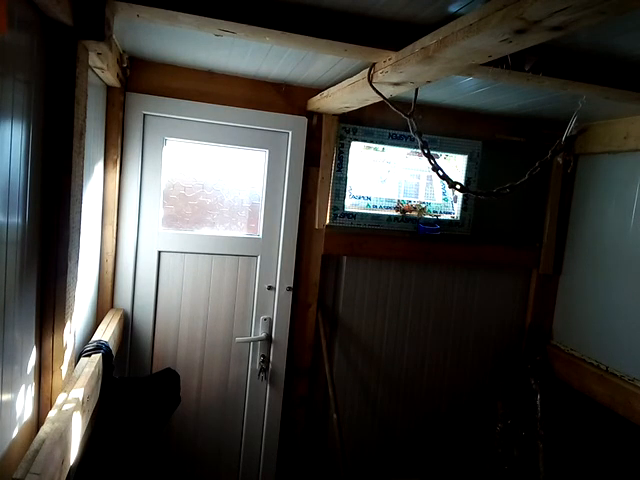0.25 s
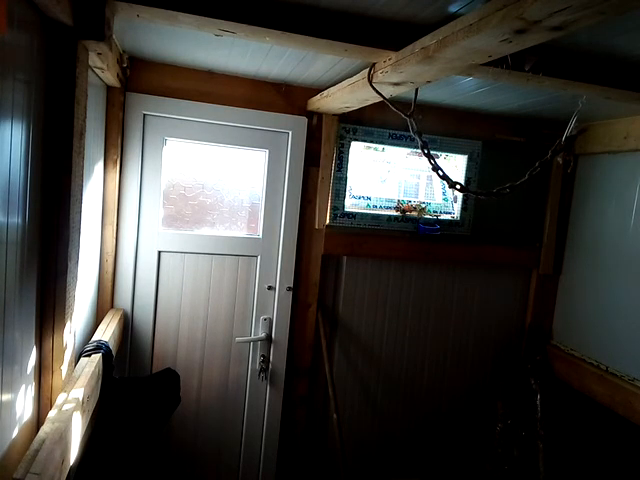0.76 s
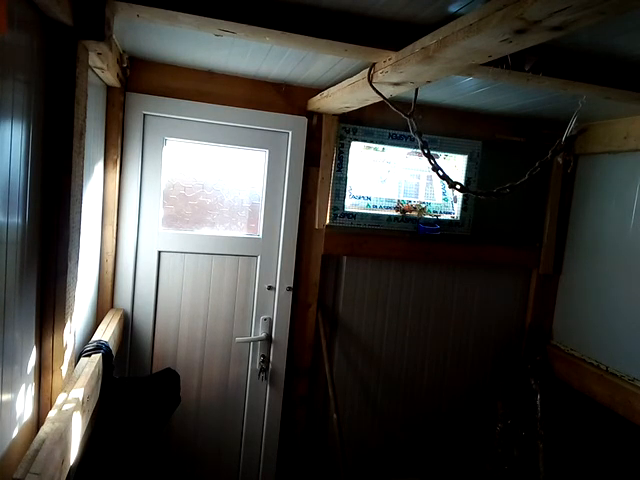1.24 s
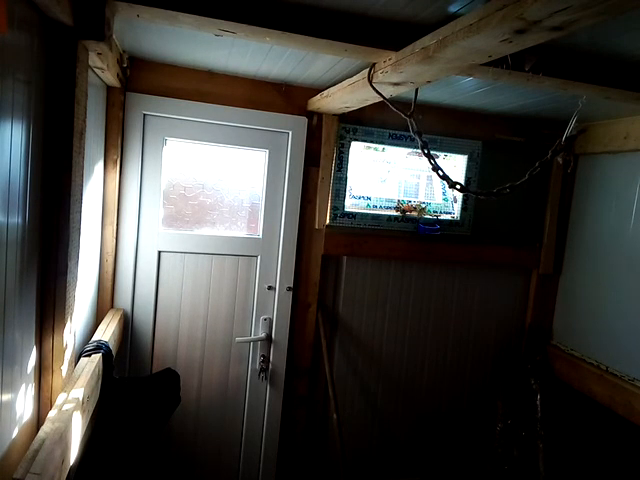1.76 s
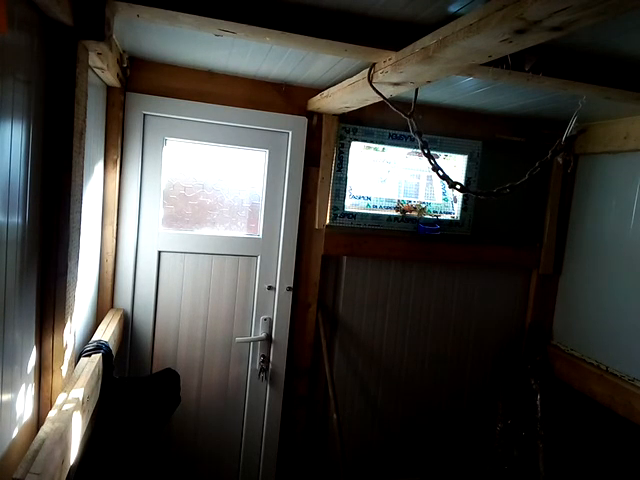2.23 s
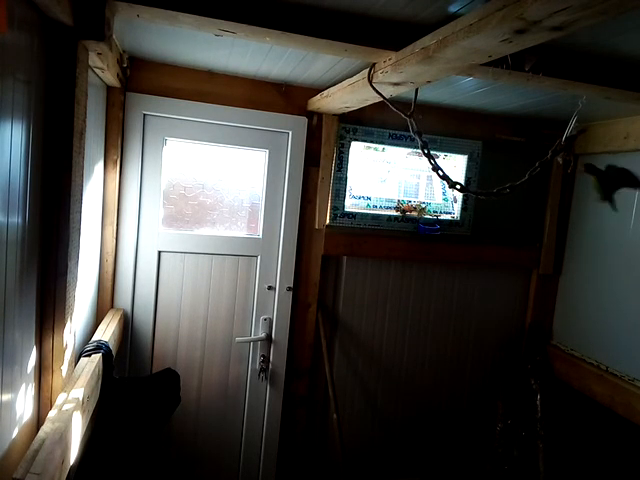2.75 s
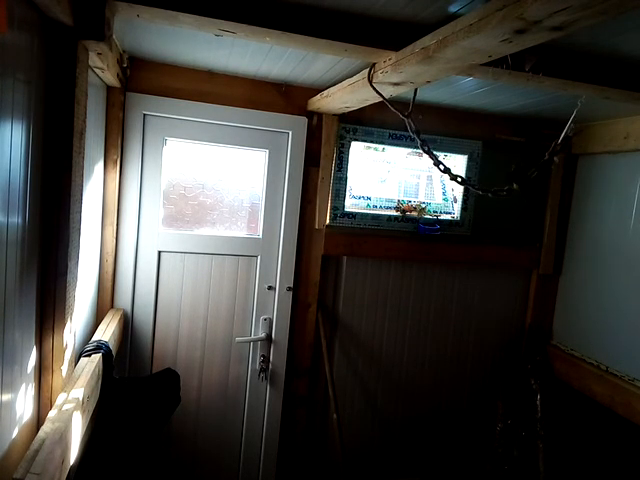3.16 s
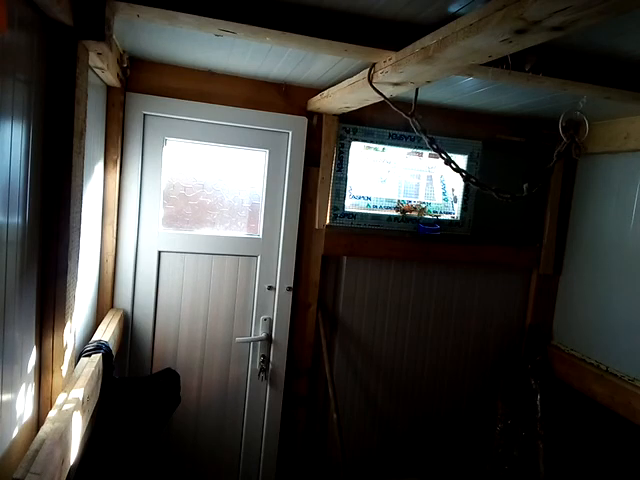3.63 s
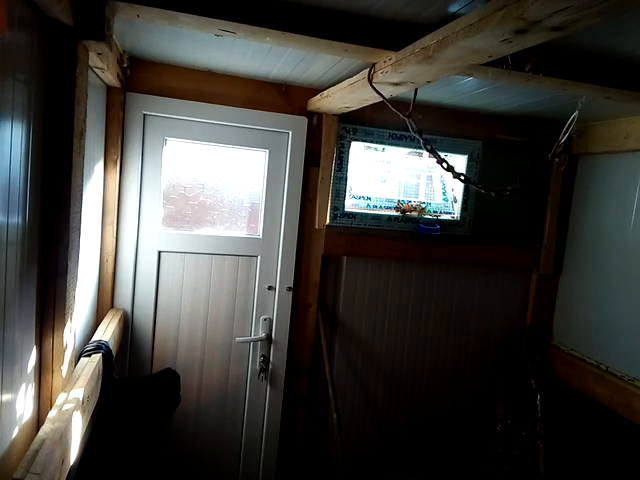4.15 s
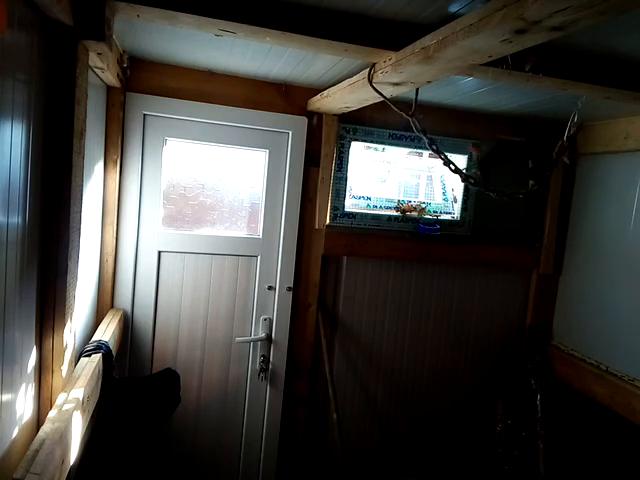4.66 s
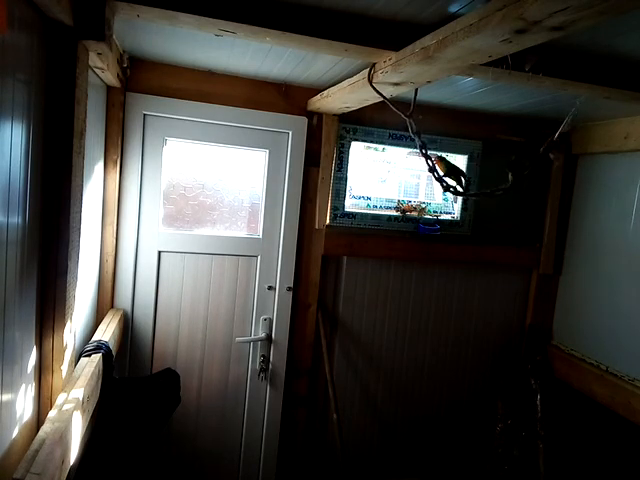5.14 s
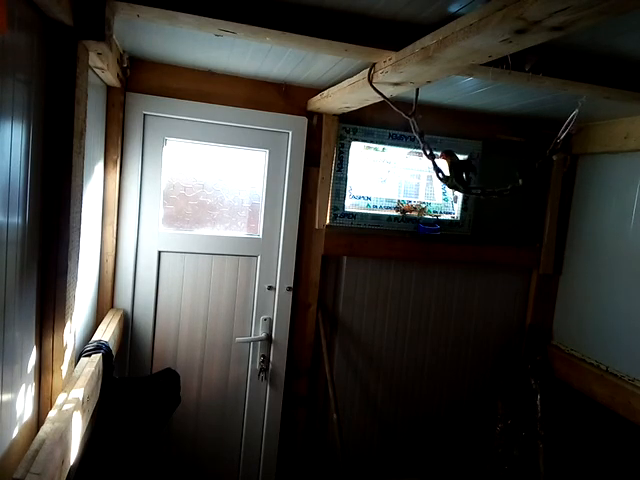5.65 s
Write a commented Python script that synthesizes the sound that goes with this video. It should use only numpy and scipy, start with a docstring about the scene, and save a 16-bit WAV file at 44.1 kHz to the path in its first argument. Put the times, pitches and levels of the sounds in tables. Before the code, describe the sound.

Inside a small wooden bird room, sharp gliding chirps burst out in groups with gaps between. Wings throb low and puff air, feathers rustle, a hanging chain tinkles faintly early on, and wood thuds softly as birds shift. A soft swish passes before the loudest, most crowded chatter near five seconds; a final brief group follows. Close indoor pickup, dense short reverberation, low thrum throughout, and clipped loudest calls.

```python
"""Small parrots call in a wooden aviary room, over feather rustle, wood drumming and a low thrum throughout.
The first whistles, short gliding tones with overtones, come at once; then a chain tinkles faintly, as ringing
sines, and birds take off: the thrum throbs and wing beats puff as bursts of noise. Calls crowd in from 1 to
2.4 s and from 2.9 to 4 s, some harsh, all smeared by dense echoes. Swishes of noise pass at 2.8 s and about
4.5 s, the busiest calls follow until 5.3 s, and a last few come at 5.6 s. The loudest calls overload."""
import sys
import numpy as np
from scipy import signal
from scipy.fft import rfft, irfft
from scipy.io import wavfile

SR = 44100
rng = np.random.default_rng(int(sys.argv[2]) if len(sys.argv) > 2 else 0)


def store_wav(level_fs):
    """Save 16-bit WAV to argv[1]."""
    pcm = np.round(np.clip(np.atleast_2d(level_fs), -1, 1) * 32767)
    wavfile.write(sys.argv[1], SR, pcm.T.astype(np.int16))


N = 259749  # length in samples, about 5.9 s


def from_db(db):
    """Turn decibels into a plain factor."""
    return 10 ** (np.asarray(db) / 20)


def rms_one(x):
    """Scale a sound to an average strength (rms) of 1."""
    return x / np.sqrt(np.mean(x ** 2) + 1e-20)


def at_hz(points, hz):
    """Read a (Hz, value) table at any pitch, with straight lines on a log pitch scale."""
    table = np.array(points)
    return np.interp(np.log(hz), np.log(table[:, 0]), table[:, 1])


def wander(hz):
    """Noise that changes about hz times a second; spread 1."""
    r = np.exp(-2 * np.pi * hz / SR)
    smooth = signal.lfilter([1], [1, -2 * r, r * r], rng.standard_normal(N + SR))
    return rms_one(smooth[SR:])  # the first second is the filter settling


def band_pass(x, low_hz, high_hz):
    """Keep only the part of a sound between two pitches."""
    return signal.sosfilt(signal.butter(2, [low_hz, high_hz], "band", fs=SR, output="sos"), x)


def layer(spectrum, low_hz, high_hz, modes=()):
    """Coloured noise, lifted at resonances, scaled to rms 1 between low_hz and high_hz."""
    hz = np.maximum(np.fft.rfftfreq(N, 1 / SR), 1)
    level_db = at_hz(spectrum, hz)
    for mode_hz, width, lift_db in modes:
        level_db = level_db + lift_db / (1 + (2 * (hz - mode_hz) / width) ** 2)
    shape = from_db(level_db) * (hz >= spectrum[0][0]) * (hz <= spectrum[-1][0])
    noise = irfft(rfft(rng.standard_normal(N)) * shape, N)
    in_band = shape[(hz > low_hz) & (hz < high_hz)]
    return rms_one(noise) * np.sqrt(np.sum(shape ** 2) / np.sum(in_band ** 2))


# The notes of the calls. Each row: start in seconds, length in seconds, pitch at the start, middle and end in Hz,
# effort in dB, level change per partial in dB, half lines in dB, roughness from 0 to 1.
NOTES = [(0.088, 0.0059, 3450, 3390, 3440, -9.5, -14, -7, 0.54),
         (0.088, 0.02, 2735, 2328, 2140, -17, -1.5, -20, 0.43),
         (0.097, 0.034, 4490, 4340, 4260, -15, 3, -32, 0.25),
         (0.133, 0.03, 3766, 4120, 4390, -12, 2, -41, 0.08),
         (0.418, 0.023, 2150, 2206, 2250, -30, -22, -30.0, 0.22),
         (0.771, 0.025, 2350, 2200, 2210, -37, -37, -36.0, 0.0),
         (1.003, 0.014, 2420, 2480, 2770, -10, -2, -17, 0.22),
         (1.094, 0.018, 2490, 2585, 2700, -14, -1.7, -25, 0.34),
         (1.095, 0.016, 3025, 2850, 3120, -12.5, -1, -31, 0.12),
         (1.184, 0.014, 2667, 2565, 2920, -10, 0.3, -20, 0.2),
         (1.642, 0.014, 2158, 2284, 3070, -11, -0.3, -10, 0.5),
         (1.652, 0.024, 5520, 5100, 5010, -4.5, 2.5, -48.5, 0.36),
         (1.655, 0.014, 6800, 6940, 6950, -8, -8, -21.5, 0.17),
         (1.764, 0.019, 5840, 6850, 6800, 0.2, -4, -29.5, 0.09),
         (1.768, 0.033, 5520, 5450, 5290, -17.5, -8, -12, 0.16),
         (2.109, 0.017, 2534, 2974, 4170, -6.4, -2.5, -40.5, 0.01),
         (2.124, 0.027, 4590, 4320, 3720, -7.0, -0.5, -24, 0.32),
         (2.155, 0.014, 2840, 3090, 3410, -6, -3, -27, 0.48),
         (2.162, 0.035, 3870, 4340, 4630, -7.5, -0.5, -36, 0.23),
         (2.29, 0.013, 3080, 3180, 2850, -11.5, -2.5, -17, 0.55),
         (2.303, 0.03, 2306, 2277, 2270, -8.5, -0.45, -10, 0.3),
         (2.316, 0.037, 2316, 3118, 3366, -3.5, -1.75, -4, 0.24),
         (2.356, 0.033, 3167, 3183, 2950, -6, -1.1, -9, 0.4),
         (2.939, 0.017, 1983, 2058, 2123, -0.7, -7, -21, 0.16),
         (2.959, 0.029, 2677, 3484, 3770, -1.5, -9, -17.5, 0.28),
         (2.978, 0.054, 5700, 5700, 6520, -14, 6, -3, 0.42),
         (2.981, 0.019, 2416, 2420, 2156, -3.6, -2, -1, 0.15),
         (3.034, 0.051, 3900, 3622, 3453, 0.1, -16, -48, 0.18),
         (3.085, 0.052, 4700, 4408, 4366, -2, -6.5, -50, 0.06),
         (3.55, 0.02, 2404, 2586, 2484, -17, -4, -6, 0.2),
         (3.562, 0.053, 2693, 2766, 2904, -11.5, -1.65, -2.0, 0.86),
         (3.61, 0.037, 2918, 2697, 2627, -7, -3.1, -9, 0.5),
         (3.683, 0.031, 3760, 3810, 3934, -6.5, -10, -39, 0.21),
         (3.827, 0.03, 1802, 1880, 2066, -9.5, -1, -17, 0.28),
         (3.84, 0.019, 4310, 4670, 4400, -14, -1, -20, 0.66),
         (3.86, 0.014, 3990, 3925, 4030, -5.5, -3, -31, 0.03),
         (3.931, 0.015, 2520, 2825, 3010, -6.5, -4.5, 2, 0.15),
         (3.938, 0.034, 4505, 4280, 4145, -13, -3, -28.5, 0.15),
         (3.95, 0.027, 2935, 2970, 3107, -3.5, -4.5, -23.5, 0.01),
         (4.733, 0.033, 2033, 2130, 2460, -11, -7.5, -21.5, 0.3),
         (4.753, 0.03, 2965, 2884, 3154, -3, -11.5, -28.5, 0.24),
         (4.757, 0.031, 3710, 3950, 4503, -3, -5, -16, 0.29),
         (4.76, 0.0484, 5950, 5390, 5280, -15.5, 4.5, -14.5, 0.55),
         (4.78, 0.044, 4233, 4460, 4700, -4.5, -11, 0, 0.51),
         (4.825, 0.071, 4370, 3897, 3440, -1.5, -14.5, -27, 0.32),
         (4.878, 0.013, 2460, 2550, 3100, -2, -14.5, -25.5, 0),
         (4.888, 0.048, 4313, 4370, 4343, -1.5, -12, -38.5, 0.2),
         (4.905, 0.022, 5790, 5430, 5100, -14, -4, -26.5, 0.1),
         (4.919, 0.018, 4425, 4610, 4850, -2.8, -11, -43.5, 0.2),
         (4.947, 0.031, 4700, 4754, 4740, -5, -2.5, -30.5, 0.19),
         (5.025, 0.0153, 1886, 1890, 2010, 1.2, -4, -25, 0.18),
         (5.049, 0.042, 4174, 4090, 3964, -2.5, -14, -28.0, 0.27),
         (5.122, 0.036, 2526, 3063, 2880, -12, -1, -19.0, 0.14),
         (5.128, 0.019, 3860, 4400, 3992, -3, -12.5, -30, 0.11),
         (5.134, 0.035, 3053, 2957, 3285, -2, -8, -34.5, 0.2),
         (5.21, 0.016, 2250, 2620, 2890, -6, -13.5, -18, 0),
         (5.222, 0.045, 3654, 4056, 3957, -2.5, -9, -28, 0.17),
         (5.262, 0.032, 4600, 5796, 5855, -5.5, -12.7, -15, 0.19),
         (5.267, 0.023, 4740, 5030, 5220, -9.5, -4, -14, 0.2),
         (5.575, 0.048, 2605, 2620, 2690, -42.5, -15, -25.0, 0.23),
         (5.616, 0.007, 1986, 2100, 2270, -3.5, -2, -8.5, 0.37),
         (5.62, 0.028, 4290, 4724, 4645, -8, -2, -37.0, 0.17),
         (5.625, 0.022, 6420, 6090, 5900, -13.5, -2, -27, 0.11),
         (5.63, 0.013, 5280, 5284, 5450, -7, -8, -9, 0.56)]
# What throat and beak let through. Each row: pitch in Hz, level in dB.
THROAT = [(1800, -6), (3000, -7.5), (4200, -1.5), (6200, 1.5), (7400, -6.5), (9000, -15), (12000, -21.5),
          (18000, -38.5)]
THROAT_CUT_HZ = 2522  # the calls thin out below this
PERCHES = 3
WOBBLE, TREMOR_DB = .11, 6  # fast pitch wobble (share of pitch) and level wobble of a fully rough voice
QUAVER = .006  # slower pitch wobble of every voice, share of pitch
ATTACK_S, CLEAN_ATTACK = 0.0022, 0.39  # shortest swell; share of a perfectly clean note spent swelling
FADE_S = 0.00043
BLOOM_S = 0.0014  # above the second, each higher partial takes this much longer to come in
HALF_FALL_DB = -7  # per whole partial away from the strongest half line
SHUT_BELOW_HZ, SHUT_LOSS_DB = 2200, -12  # a beak still shut muffles low notes above the second partial


def birds():
    """Gliding tones pass the throat; rough voices wobble, and uneven cycles add half lines. One row per perch."""
    perches = np.zeros((PERCHES, N))
    pitch_noise, slow_noise, level_noise = wander(590), wander(60), wander(630)
    for k, (start, length, hz0, hz1, hz2, effort_db, fall_db, half_db, rough) in enumerate(NOTES):
        first, t = round(start * SR), np.arange(round(length * SR)) / SR
        span = slice(first, first + len(t))
        glide = np.interp(t / length, [0, .5, 1], [hz0, hz1, hz2])
        pitch = glide * (1 + WOBBLE * rough * pitch_noise[span] + QUAVER * slow_noise[span])
        phase = 2 * np.pi * np.cumsum(pitch) / SR

        # harsh notes break in at once, clean ones swell
        attack_s = max(ATTACK_S, CLEAN_ATTACK * length * (1 - 4.0 * rough))
        ramp = np.clip(np.minimum(t / attack_s, (length - t) / FADE_S), 0, 1)
        tremor = from_db(TREMOR_DB * rough * level_noise[span])
        swell = np.sqrt(2) * np.sin(np.pi / 2 * ramp) * tremor

        for multiple in np.arange(1, 13) / 2:
            level_db = effort_db + fall_db * (multiple - 1) + at_hz(THROAT, multiple * glide)
            if hz1 < SHUT_BELOW_HZ and multiple > 2:
                level_db += SHUT_LOSS_DB
            if multiple % 1:  # a half line; the one just above the fundamental is favoured
                level_db += half_db + HALF_FALL_DB * abs(multiple - 3 / 2)
            in_range = multiple * glide < SR / 2.5
            bloom = np.clip(t / (BLOOM_S * max(multiple - 2, .1)), 0, 1) ** 2
            perches[k % PERCHES, span] += in_range * bloom * swell * from_db(level_db) * np.sin(multiple * phase)
    return signal.sosfilt(signal.butter(6, THROAT_CUT_HZ, "high", fs=SR, output="sos"), perches)


# How long the echoes last. Each row: pitch in Hz, time to die by 60 dB in seconds.
ROOM_T60 = [(1500, 0.23), (4000, 0.29), (8000, 0.26), (14000, 0.23)]
DIRECT_DB, ECHO_DB = -10, -8.0
ECHO_RISE_S = 0.0039  # the cloud of echoes thickens over this time


def room(x):
    """Direct sound, then a dense cloud of wall echoes that dies band by band."""
    t, edges = np.arange(SR) / SR, 500 * 2 ** np.arange(0, 5.3, .5)  # half octaves
    echoes = np.zeros(len(t))
    for low, high in zip(edges, edges[1:]):
        band = band_pass(rng.standard_normal(len(t)), low, high)
        echoes += band * from_db(-60 * t / at_hz(ROOM_T60, np.sqrt(low * high)))
    echoes *= np.clip(t / ECHO_RISE_S, 0, 1) ** 2
    echoes /= np.sqrt(np.sum(echoes ** 2))
    return from_db(DIRECT_DB) * x + from_db(ECHO_DB) * signal.fftconvolve(x, echoes)[:N]


AIR_HZ = (700, 1650)  # band in which the levels of wing beats and rustle hold
# Wing beats. Each row: start in seconds, peak level in dB before the room, time to fall by 9 dB in seconds.
FLAPS = [(0.894, -36, 0.031), (0.959, -35.5, 0.01), (1.254, -35.5, 0.037), (1.492, -44.5, 0.029),
         (1.582, -44.5, 0.045), (1.955, -40, 0.022), (2.018, -33, 0.021), (2.765, -58, 0.023),
         (3.662, -34.5, 0.026), (4.19, -49, 0.028), (4.669, -53, 0.075), (4.843, -22.5, 0.036),
         (5.745, -37.5, 0.0083)]
# Colour of a wing beat. Each row: pitch in Hz, relative level in dB per Hz.
FLAP = [(380, -46.5), (650, -10), (1090, -1), (2830, -3), (4570, -2.5), (4950, -12), (5880, 0),
        (15500, -23.5)]


def wings():
    """Each beat is a sudden puff of air noise that dies away quickly."""
    t, puffs = np.arange(N) / SR, np.zeros(N)
    for start, peak_db, length in FLAPS:
        puffs += (t >= start) * from_db(peak_db - 9 * np.maximum(t - start, 0) / length)
    return puffs * layer(FLAP, *AIR_HZ)


# A bird sweeps past. Each row: time of the peak in seconds, length in seconds, peak level in dB.
SWISHES = [(4.4, 0.11, -55.5), (4.535, 0.24, -41), (2.8, 0.1, -60)]
# Colour of the swish. Each row: pitch in Hz, relative level in dB per Hz.
SWISH = [(410, -40), (700, -10), (1260, 0), (1510, -8.5), (2030, -3), (4110, -3.5), (6600, -9),
         (15000, -37)]


def swishes():
    """Air through spread feathers swells and fades smoothly, as bright noise."""
    t, swell = np.arange(N) / SR, np.zeros(N)
    for peak, length, peak_db in SWISHES:
        swell += from_db(peak_db) * np.cos(np.pi * np.clip((t - peak) / length, -.5, .5)) ** 2
    return swell * layer(SWISH, 700, 15000)


# Touches of a hanging chain. Each row: start in seconds, level in dB before mode levels, chance and the room.
TINKLES = [(.414, -49.5), (.755, -58.5), (.85, -56)]
# Tones (modes) of the links. Each row: pitch in Hz, relative level in dB, time to die by 60 dB in seconds.
CHAIN = [(7040, 8, .1), (10500, -6, .1), (9900, -10, .08)]


def chain():
    """Each touch of the links rings every mode with a strength of its own."""
    out = np.zeros(N)
    for start, peak_db in TINKLES:
        t = np.maximum(np.arange(N) / SR - start, 0)
        for hz, mode_db, t60 in CHAIN:
            level_db = peak_db + mode_db + rng.normal(0, 2) - 60 * t / t60
            out += from_db(level_db) * np.sin(2 * np.pi * hz * t)
    return out


# Colour of the feather rustle. Each row: pitch in Hz, relative level in dB per Hz.
RUSTLE = [(380, -35), (650, -15), (732, 2.5), (848, 4.5), (1520, 2), (2170, -2.5), (5290, -12), (6370, -12),
          (15500, -40)]
GRAIN_DB, PATCH_DB = 1.0, 1.3  # spread of the quick grains and of the slower changes in each half octave


def rustle():
    """Feather noise in grains; each half octave comes and goes on its own."""
    noise, edges = layer(RUSTLE, *AIR_HZ), 600 * 2 ** np.arange(0, 5.1, .5)
    patches = np.zeros(N)
    for low, high in zip(edges, edges[1:]):
        patches += from_db(PATCH_DB * wander(19)) * band_pass(noise, low, high)
    return from_db(GRAIN_DB * wander(72)) * patches


# Flights, a low throb of air at every beat. Each row: start in seconds, length in seconds, beats per second,
# peak level in dB.
FLIGHTS = [(0.538, 0.096, 17, -42), (0.947, .23, 20, -35.5), (1.949, 0.17, 22, -35),
           (2.224, 0.29, 19, -33.5), (2.583, 0.1, 19, -46), (2.72, 0.033, 18.5, -25),
           (3.805, .45, 19.6, -38), (4.341, .045, 19, -35), (4.587, 0.065, 19, -42),
           (4.835, 0.25, 21, -48.5)]
BEAT_DEPTH = 0.93  # share of the throb that comes and goes with the beat
TAKE_OFF_S, THRUM_WAVER_DB = 0.028, 4  # time for a flight to come in and go; spread of the slow waver


def throb(rest):
    """Loudness of the low thrum: it wavers at rest and pulses with the wing beat of each flight."""
    t, level = np.arange(N) / SR, rest * from_db(THRUM_WAVER_DB * wander(4))
    for start, length, per_s, peak_db in FLIGHTS:
        aloft = np.clip(np.minimum(t - start, start + length - t) / TAKE_OFF_S, 0, 1)
        beat = 1 - BEAT_DEPTH * np.cos(np.pi * per_s * (t - start)) ** 2
        level = np.hypot(level, from_db(peak_db) * aloft * beat)
    return level


# Background of the room. Each row: time in seconds, feather rustle in dB, wood drumming in dB, low thrum in dB
# before its waver.
STIR = [(0.0, -51.5, -59.5, -45), (0.29, -59, -57, -50), (0.43, -71, -53, -50), (0.93, -47.5, -60, -41.5),
        (1.1, -47.5, -45, -44), (1.39, -48.5, -51, -49.5), (1.93, -51, -51.5, -48), (2.12, -53.5, -53, -50),
        (2.48, -50.5, -53, -39), (2.85, -48.5, -52.5, -52), (3.08, -58, -60.5, -47), (3.71, -49, -54, -56),
        (3.85, -51, -46, -45), (4.0, -50, -45.5, -34.5), (4.35, -53, -51, -51.5), (4.89, -47, -54.5, -48),
        (5.1, -61.5, -62, -49.5), (5.43, -51, -52, -49), (5.69, -54.5, -62, -47), (5.89, -52, -55.5, -47)]
# Birds shift on the wood. Each row: time of the peak in seconds, rustle in dB, drumming in dB, rise in seconds,
# fall in seconds; rise and fall are each the time for 12 dB.
SHIFTS = [(.4, -45.5, -61, 0.25, 0.36), (.9, -36, -43.5, 0.0081, 0.17), (1.05, -33.5, -34, 0.081, 0.073),
          (1.288, -36, -33.5, .03, 0.068), (1.53, -61, -43.5, 0.022, 0.093), (1.66, -41.5, -44, 0.11, 0.15),
          (1.801, -35.5, -60, .02, 0.035), (1.87, -61, -41.5, 0.02, 0.077),
          (1.98, -34.5, -38.5, 0.064, 0.13), (2.43, -44, -39, .04, 0.04),
          (2.589, -41.5, -44.5, 0.043, 0.054), (2.76, -50, -52.5, 0.039, 0.052),
          (3.35, -52.5, -47.5, 0.1, 0.039), (3.669, -41.5, -45, .01, 0.065),
          (3.77, -41, -42.5, 0.098, 0.093), (4.212, -43.5, -50, 0.22, 0.045),
          (4.54, -52.5, -45, 0.046, 0.067), (4.671, -51, -44, 0.0084, 0.086),
          (4.871, -44, -32, 0.024, 0.053), (5.0, -40.5, -46, 0.059, 0.11), (5.13, -66, -63, .02, 0.083)]
# Colours of the drumming, the thrum and a steady far-off rumble. Each row: pitch in Hz, relative level in dB per Hz.
DRUMMING = [(97, -32.5), (165, -1), (253, -1), (286, -3.5), (329, 2.5), (527, 6), (700, -1.5), (910, -38),
            (1540, -120)]
THRUM = [(40, -22.5), (46, -16), (52, 3.5), (145, -1), (160, -13.5), (170, -15)]
RUMBLE = [(8.8, -35), (15, -10), (27, -12.5), (48, -1.5), (62, -25.5), (110, -120)]
# Resonances of walls and floor. Each row: pitch in Hz, width in Hz, lift in dB.
WOOD = [(62, 8.5, 5.5), (79, 11, -2), (97.1, 32, 8.5), (136.3, 8.7, 11.5), (185, 33, 4), (215.8, 47, 12.5),
        (285.1, 38, 13.5), (374, 3.3, 10), (512, 17, 5.5), (577, 24, 6)]
WOOD_HZ, THRUM_HZ, RUMBLE_HZ = (170, 650), (40, 165), (10, 49)  # bands in which the levels hold
RUMBLE_DB = -62


def stirring():
    """Feathers rustle in grains; the wooden walls drum and thrum beneath, over a far rumble."""
    t, (times, *columns) = np.arange(N) / SR, np.transpose(STIR)
    rustling, drumming, rest = from_db([np.interp(t, times, column) for column in columns])
    for peak, rustle_db, drumming_db, rise, fall in SHIFTS:
        swell_db = -12 * np.maximum((peak - t) / rise, (t - peak) / fall)
        rustling = np.hypot(rustling, from_db(rustle_db + swell_db))
        drumming = np.hypot(drumming, from_db(drumming_db + swell_db))
    feathers = rustling * rustle()
    walls = drumming * layer(DRUMMING, *WOOD_HZ, WOOD)
    thrum = throb(rest) * layer(THRUM, *THRUM_HZ, WOOD)
    rumble = from_db(RUMBLE_DB) * layer(RUMBLE, *RUMBLE_HZ)
    return feathers + walls + thrum + rumble


def scene():
    """Every perch has its own pattern of echoes; wing beats and chain share another."""
    voices = sum(room(voice) for voice in birds())
    return (voices + room(wings() + chain()) + stirring() + swishes())[None]


CUTOFF_HZ = 15800


def record(dry):
    """The loudest peaks overload and are cut flat, then the highest treble is removed."""
    overloaded = np.clip(dry, -.97, .97)
    return signal.sosfilt(signal.cheby2(20, 80, CUTOFF_HZ, fs=SR, output="sos"), overloaded)


dry = scene()
out = record(dry)
store_wav(out)
```